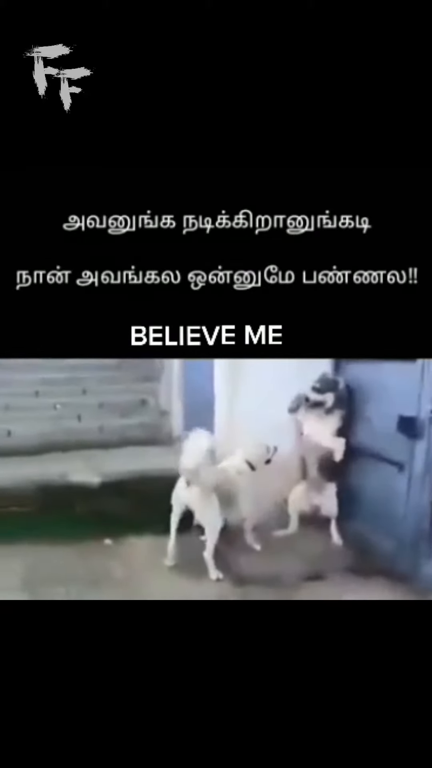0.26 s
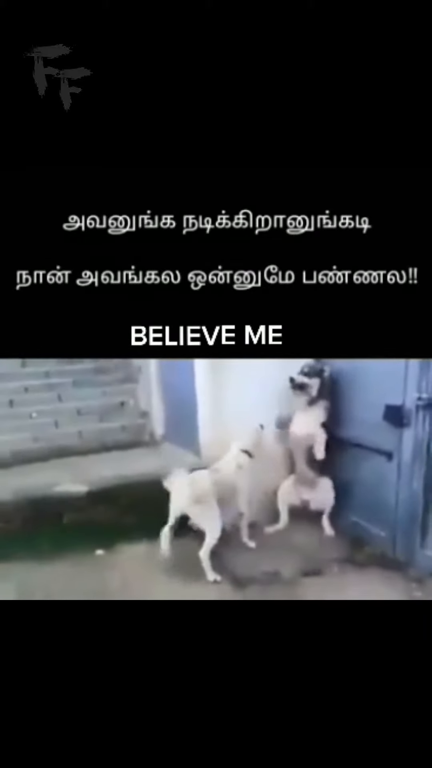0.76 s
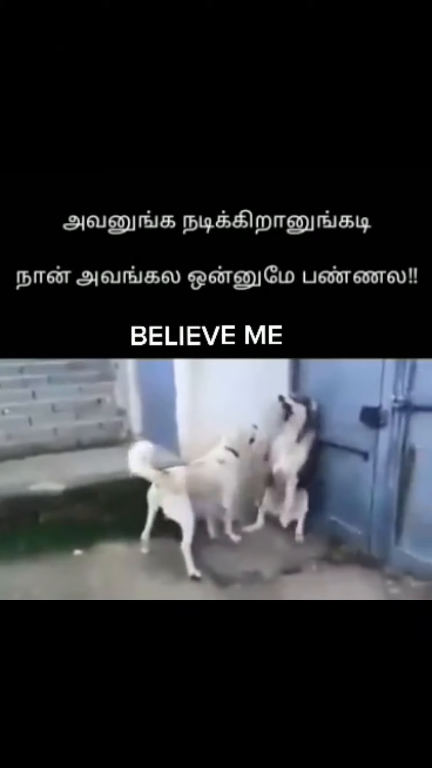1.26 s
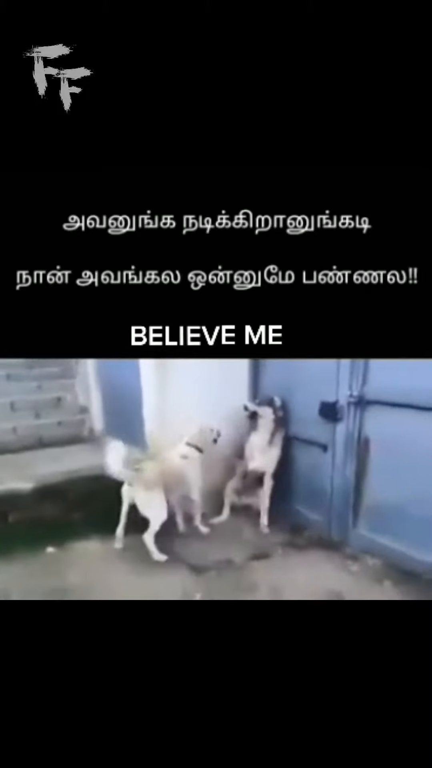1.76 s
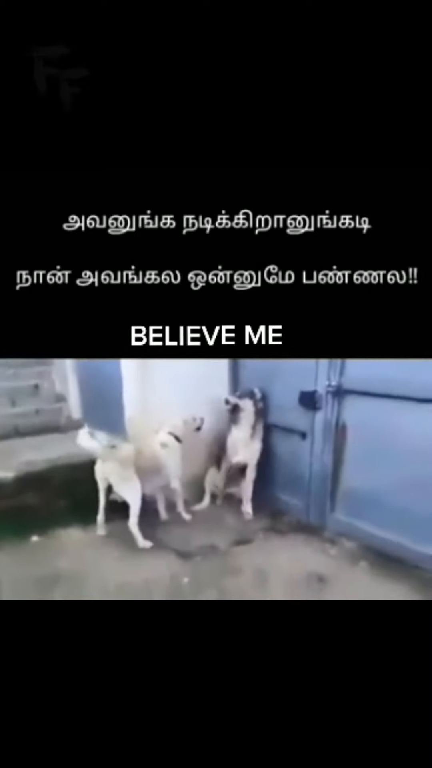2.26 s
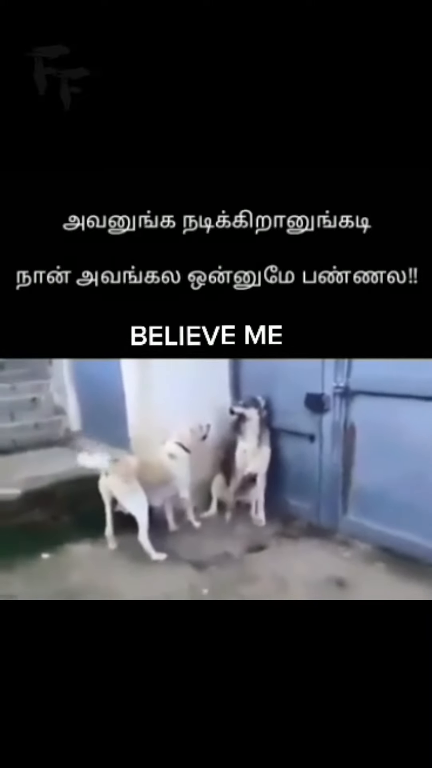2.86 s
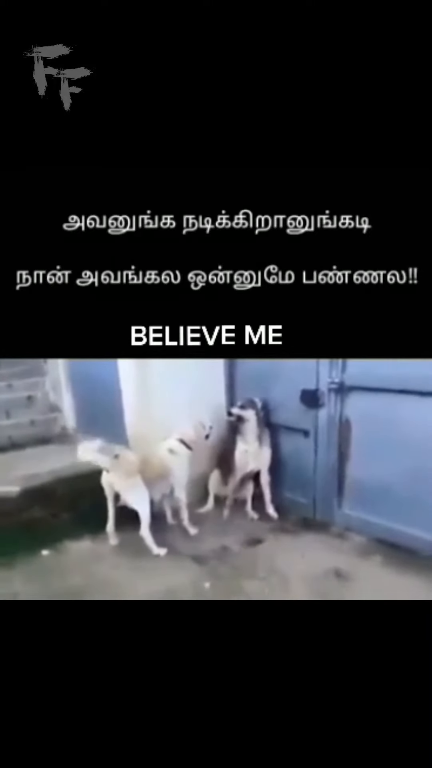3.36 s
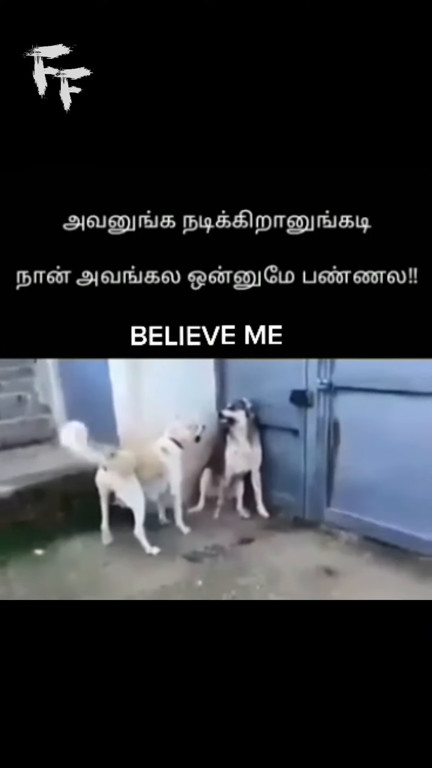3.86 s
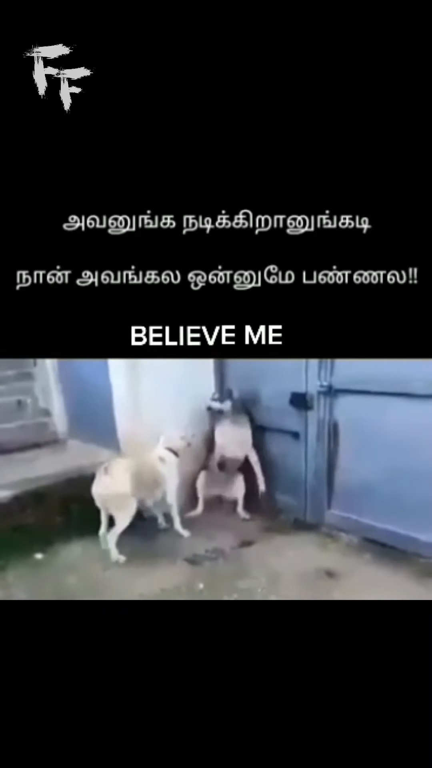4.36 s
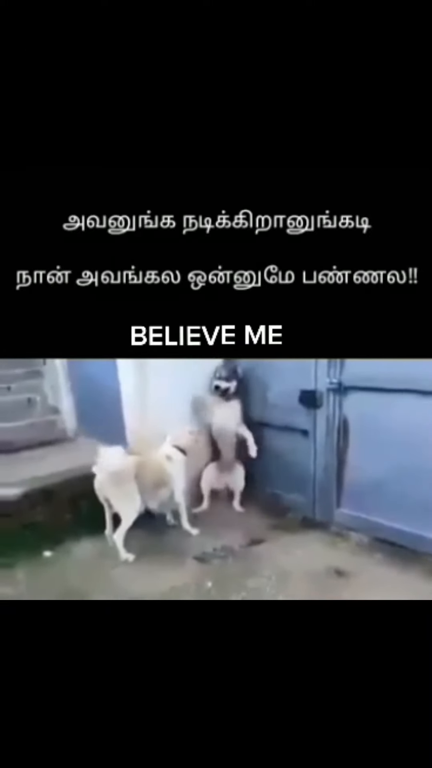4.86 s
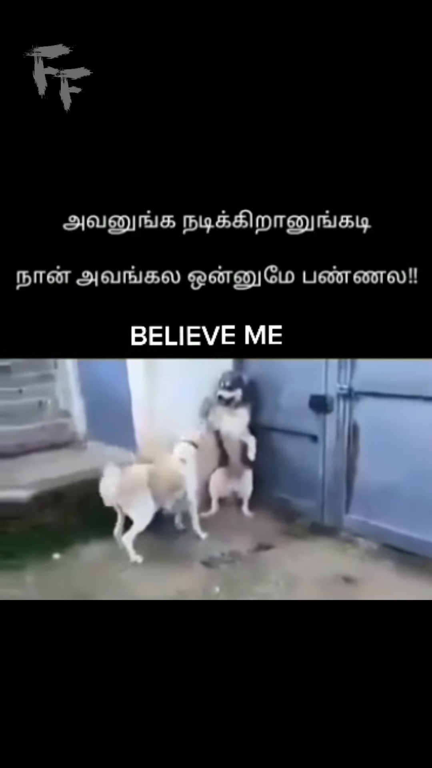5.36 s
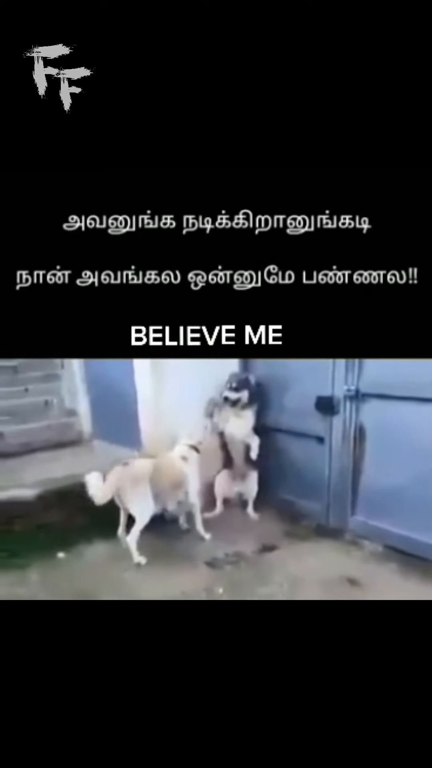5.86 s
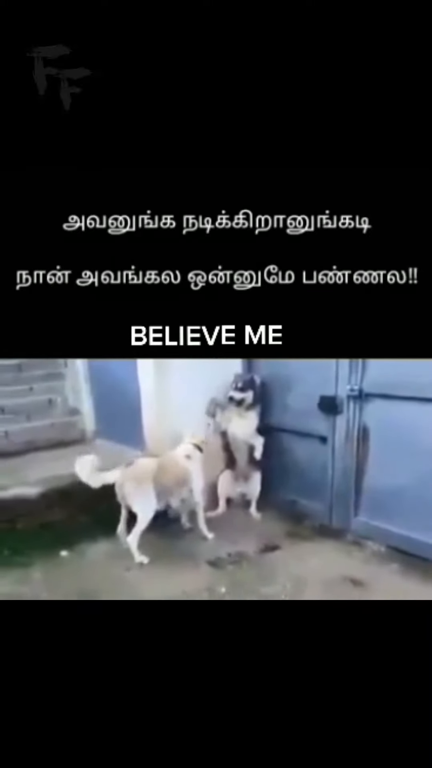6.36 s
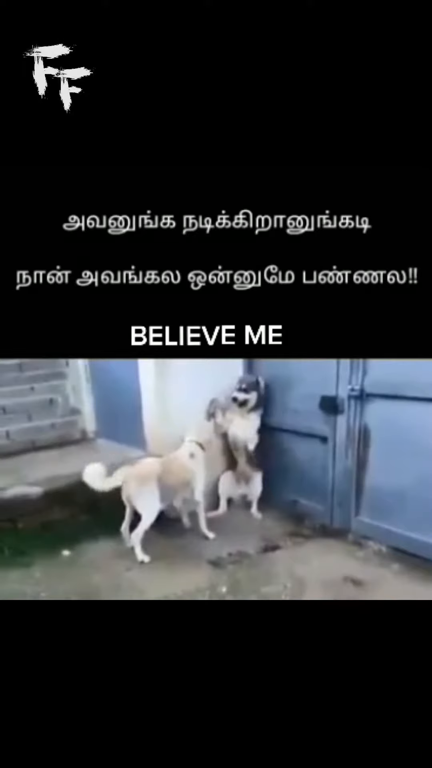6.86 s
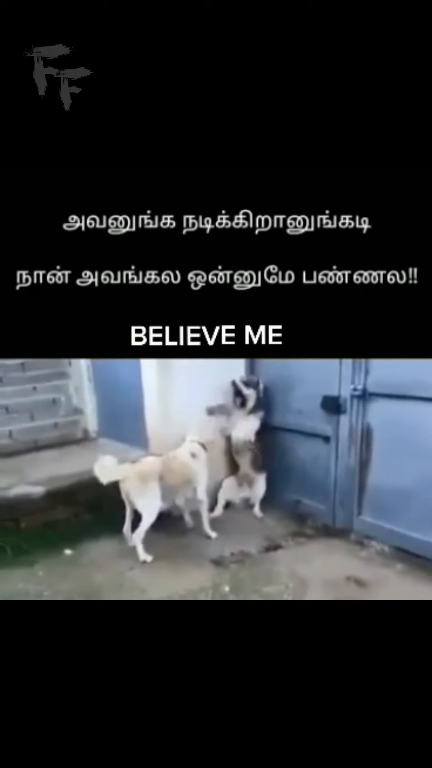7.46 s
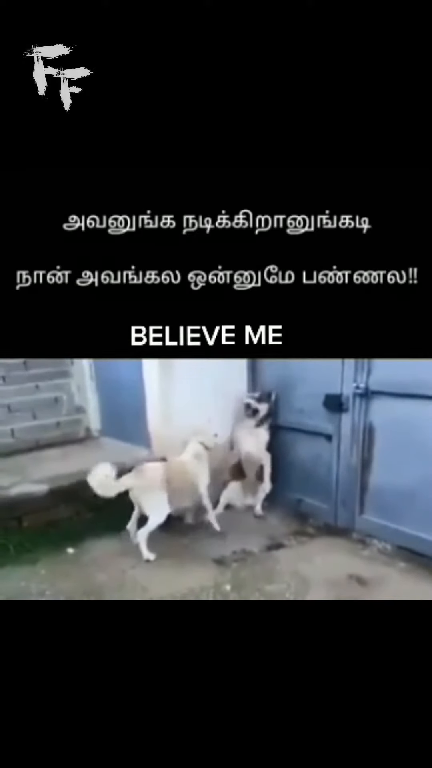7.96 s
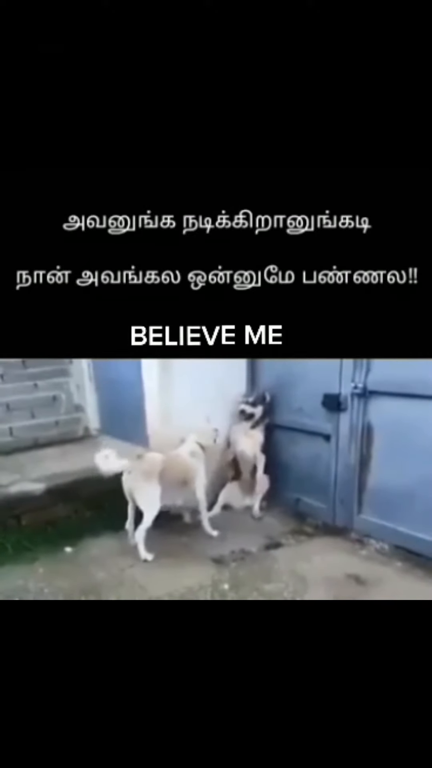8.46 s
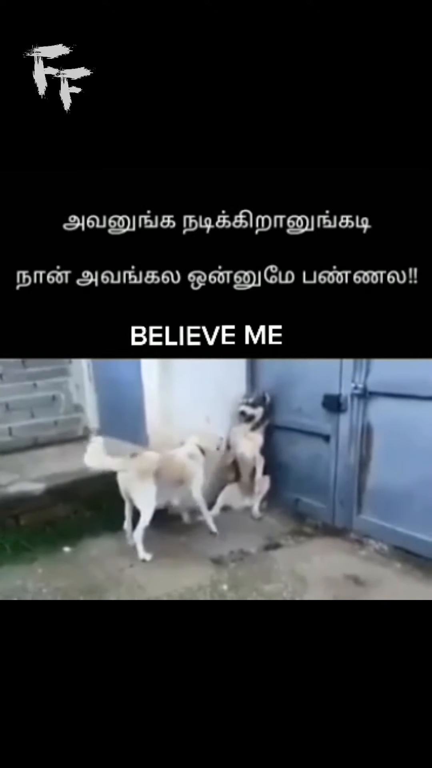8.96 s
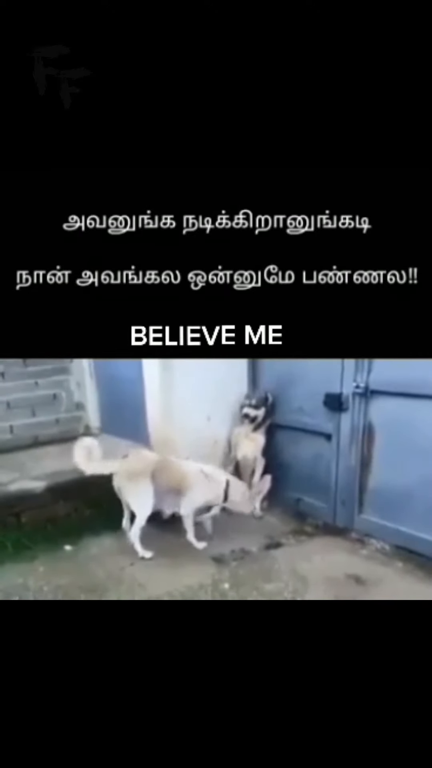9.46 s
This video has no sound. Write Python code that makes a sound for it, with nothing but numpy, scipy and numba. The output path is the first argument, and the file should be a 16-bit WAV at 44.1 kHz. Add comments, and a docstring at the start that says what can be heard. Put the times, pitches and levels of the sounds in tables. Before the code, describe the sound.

Two dogs face off outdoors with high yelps, harsh irregular barks, hissing snarls and low growls over a faint rumble.

```python
"""Two dogs in a paved yard, one backed against a wall and a steel gate, on a small, nearly mono recorder.
The cornered dog yelps first, then harsh barks burst out, ragged vocal folds ringing throat and mouth.
Between the uneven barks that follow, snarls hiss past bared teeth, growls flap low and claws scuff.
A last flurry brings a low whine, and one more bark ends it. All along, the near walls throw back short
echoes over a low rumble; the loudest barks drive the limiter, and some carry a crack of overload."""
import sys
import numpy as np
from scipy import signal
from scipy.fft import rfft, irfft, next_fast_len
from scipy.io import wavfile
from scipy.ndimage import uniform_filter1d, minimum_filter1d
from numba import njit

SR = 44100
rng = np.random.default_rng(int(sys.argv[2]) if len(sys.argv) > 2 else 0)


def wav_record(signal):
    """Record a signal, one row per channel, as 16-bit PCM in the file named by sys.argv[1]."""
    frames = np.transpose(np.atleast_2d(signal))
    bounded = np.clip(frames, -1, 1)
    # unit amplitude maps onto the largest positive 16-bit level
    quanta = np.round(bounded * 32767).astype(np.int16)
    wavfile.write(sys.argv[1], SR, quanta)


N = 429086

# Table levels are relative: each source adds its own trim.
# likeness of the noise in the left and right channels: frequency_hz, correlation
STEREO_LIKENESS = [(20, 1), (3700, 1), (4500, .96), (8000, .72), (13000, .8)]
# spectrum of the yard's low rumble: frequency_hz, density_db
RUMBLE_SPECTRUM = [(20, -23), (40, -8), (65, 0), (100, 0), (160, -5), (230, -15), (400, -26)]
# rise and fall of the rumble: time_s, level_db
RUMBLE_LEVELS = [(0, -34), (.25, -44), (1.498, -43), (2.65, -42.5), (3.06, -44.5), (3.76, -48),
                 (4.142, -36), (4.77, -49), (5.3, -39.5), (6.55, -40), (6.83, -48.5), (7.1, -39),
                 (8.2, -44), (8.941, -37.5), (9.73, -44.5)]
# echoes off the walls and gate: delay_s, level_db
WALL_ECHOES = [(.0036, -27.5), (.0091, -11), (0.0147, -11.5), (0.0212, -16.5)]
# notes at which the corner and gate ring: frequency_hz, width_hz, level_db
CORNER_MODES = [(372, 48, 0.5), (544, 130, -12.5), (1260, 7.2, -27), (2210, 6.7, -10.5)]
# claws on the paving: start_s, level_db, centre_hz, decay_s
CLAW_SCUFFS = [(1.789, -19, 990, 0.0098), (1.798, -26.5, 2200, 0.028), (2.836, -22, 2350, 0.014),
               (3.488, -29, 2300, 0.01), (4.125, -24, 2300, 0.011), (5.088, -39, 2400, 0.0087),
               (6.006, -27, 2360, .014), (7.018, -19.5, 2200, 0.014), (8.28, -11, 1750, 0.0067)]
# growls: start_s, attack_s, hold_s, release_s, level_db, start_pitch_hz, hold_end_pitch_hz
GROWLS = [(2.013, 0.28, 0.13, 0.25, -37, 100, 84.5), (4.88, 0.22, 0.017, 0.3, -33, 171, 148),
          (5.13, 0.35, 0.059, 0.072, -25, 125.5, 99.8), (5.746, 0.036, 0.57, 0.5, -46, 87.6, 70.4),
          (7.357, 0.032, 0.012, 0.1, -30.5, 67.3, 72.4), (7.547, 0.13, 0.067, 0.1, -28, 87.8, 109.3),
          (8.313, 0.058, 0.19, 0.64, -35.5, 109.7, 109.3)]
# snarls: start_s, attack_s, hold_s, release_s, throat_db, hiss_db, teeth_db
SNARLS = [(0, 0.012, 0.12, 0.56, -41, -37, -61.5), (0.407, 0.055, 0.035, 0.39, -36.5, -37.5, -67),
          (0.937, 0.081, 0.11, 0.2, -37.5, -29.5, -49), (1.28, .074, 0.09, 0.14, -41, -37.5, -52.5),
          (1.537, 0.03, 0.013, 0.23, -55, -39, -60), (1.925, 0.025, 0.18, 0.19, -54, -38, -58),
          (2.1, 0.075, 0.22, .1, -46, -55, -85), (2.392, 0.066, 0.022, 0.29, -41.5, -38, -77),
          (2.565, 0.068, 0.094, .2, -49, -47, -68), (2.765, 0.091, 0.088, 0.12, -42.5, -38.5, -71),
          (3.3, 0.049, 0.2, 0.043, -72, -39.5, -60.5), (3.4, .05, .3, .15, -45, -60, -78),
          (3.68, .32, .2, .12, -45.5, -40.5, -69), (4.848, 0.083, 0.24, 0.24, -43, -43.5, -71),
          (5.21, 0.086, 0.07, 0.75, -38.5, -41, -66.5), (5.65, 0.059, 0.15, 0.11, -43, -34, -56.5),
          (5.977, 0.029, 0.48, 0.079, -46, -38, -69.5), (6.766, 0.011, 0.26, 0.037, -38, -38.5, -58.5),
          (6.93, 0.058, .03, 0.038, -45, -35.5, -60), (7.055, 0.048, 0.093, .1, -48.5, -44.5, -76),
          (7.158, 0.13, 0.05, 0.36, -44.5, -36.5, -72), (7.46, 0.051, 0.11, 0.54, -42, -43, -71.5),
          (7.952, .04, 0.13, 0.41, -35, -37.5, -56.5), (8.54, 0.037, 0.12, 0.17, -58, -48, -70),
          (8.682, 0.15, 0.068, 0.21, -41.5, -35, -66), (8.976, 0.057, 0.22, 0.094, -45, -40.5, -74),
          (9.497, 0.019, 0.025, 0.22, -39, -40.5, -55)]
# air in a snarling throat: frequency_hz, density_db
THROAT_SPECTRUM = [(200, -24), (330, -17), (450, -9), (620, -1.5), (900, -3.5), (1350, -5.5), (1800, -6.5),
                   (2600, -52.5)]
# hiss of a snarl: frequency_hz, density_db
HISS_SPECTRUM = [(1000, -10.5), (1600, -6), (2300, -5.5), (3100, -7.5), (3900, -15.5), (4600, -38),
                 (5800, -37), (8000, -41), (11000, -48), (13000, -69)]
# air rushing past the teeth: frequency_hz, density_db
TEETH_SPECTRUM = [(3500, -29), (4400, -13.5), (4800, 4.5), (6500, 2), (8000, -9), (11000, -17.5),
                  (13000, -21)]
# note to which the curled lips tune the snarls: time_s, centre_hz
LIP_TUNING = [(0.451, 2410), (.55, 2840), (1.0, 2050), (2.2, 2095), (2.5, 2360), (2.9, 2195), (4.0, 2480),
              (5.1, 2130), (5.45, 2280), (6.0, 2134), (6.4, 2446), (7.2, 2420), (7.35, 2280), (8.7, 2364),
              (8.85, 2580), (9.201, 2250)]
# air catching behind the lips: start_s, attack_s, hold_s, release_s, level_db, from_hz, to_hz
WHEEZES = [(.45, 0.028, 0.037, 0.042, -35.5, 2370, 2840), (2.42, .04, .04, .08, -48, 2350, 2423),
           (5.28, 0.03, .1, 0.098, -41.5, 2120, 2345), (7.22, 0.043, 0.038, .07, -41.5, 2480, 2330),
           (8.77, 0.054, 0.047, 0.074, -42, 2400, 2570)]
# short, bright cracks, mostly as the loudest barks overload the recorder: start_s, level_db
OVERLOAD_CRACKS = [(4.825, -37), (5.623, -29), (6.778, -34), (7.907, -33), (9.473, -24)]
# yelps and whines, one list of points a glide: time_s, pitch_hz, fundamental_db, octave_db, husk_db
YELP_GLIDES = [
    [(.094, 1380, -38, -40, -3), (.114, 1500, -21, -27, -3), (.136, 1770, -14, -23, -4),
     (.144, 1830, -23, -24, -4), (.152, 1870, -11, -23, -12), (.165, 1885, -9, -21, -15),
     (.185, 1885, -9, -24, -19), (.196, 1860, -17, -25, -14), (.203, 1830, -30, -26, -8),
     (.216, 1790, -14, -26, -14), (.224, 1760, -24, -28, -6), (.231, 1720, -12, -27, -8),
     (.252, 1540, -21, -29, -2), (.268, 1680, -29, -46, -4), (.3, 1600, -42, -56, -3)],
    [(.31, 1500, -42, -60, -8), (.33, 1505, -25, -52, -14), (.355, 1495, -25, -52, -14),
     (.395, 1490, -44, -60, -8)],
    [(1.335, 1600, -44, -42, -3), (1.38, 1780, -27, -32, -4), (1.4, 1870, -21, -29, -7),
     (1.422, 1885, -16.5, -28, -11), (1.445, 1790, -27, -31, -3), (1.48, 1640, -40, -44, -2)],
    [(8.35, 310, -48, -62, -8), (8.41, 440, -27, -46, -6), (8.47, 610, -21, -42, -6),
     (8.52, 610, -20, -43, -6), (8.56, 580, -30, -52, -5), (8.68, 560, -46, -66, -4)],
]
# narrow peaks colouring the barks' upper rasp, before each bark shifts them: centre_hz, width_hz, level_db
RASP_PEAKS = [(1978, 82, 8.5), (2320, 60, 1), (2564, 120, -1.5), (3027, 46, 2), (3376, 37, -0.5),
              (3690, 22, 0), (4027, 15, 2.5)]
# the voice locking onto one resonance: start_s, length_s, level_db, from_hz, to_hz
BRAYS = [(.81, 0.0061, -11.5, 560, 559), (.83, 0.034, -13, 588, 656), (0.906, 0.027, -15.5, 1465, 1396),
         (1.177, 0.033, -11, 890, 916), (1.261, 0.034, -17.5, 567, 559), (1.471, 0.032, -13.5, 678, 693),
         (1.523, 0.039, -16, 568, 565), (1.868, .02, -12.5, 777, 733), (1.891, 0.014, -7.5, 615, 647),
         (3.202, .012, -11.5, 1025, 1057), (3.215, 0.018, -9, 628, 654), (3.247, 0.017, -10.5, 635, 606),
         (3.265, .024, -9.5, 1325, 1358), (4.402, 0.013, -4.5, 565, 584), (4.455, 0.031, -13, 1300, 1253),
         (4.477, 0.021, -12, 607, 630), (4.52, 0.032, -8, 589, 565), (4.775, .036, -11, 581, 574.5),
         (4.792, 0.013, -19.5, 1700, 1600), (5.529, 0.012, -13.5, 783, 764), (5.572, 0.011, -6.5, 850, 726),
         (5.617, 0.026, -6.5, 1167, 1184), (6.686, 0.029, -10.5, 851, 803), (6.725, .014, -8, 1200, 1282),
         (6.755, 0.031, -8.5, 1156, 1454), (7.775, 0.016, -13, 613, 670), (7.811, 0.016, -8.5, 969, 924),
         (7.837, 0.023, -5.5, 1021, 1024), (7.855, 0.017, -6.5, 713, 792), (9.371, 0.013, -14, 920, 962),
         (9.397, 0.013, -9.5, 790, 876), (9.411, 0.013, -6.5, 550, 556), (9.428, .018, -10.5, 852, 865),
         (9.454, 0.018, -9.5, 1300, 1467)]
# barks: start_s, attack_s, hold_s, release_s, throat_db, jaw_db, mouth_db, rasp_db, brightening_db,
# throat_hz, jaw_from_hz, jaw_to_hz, mouth_from_hz, mouth_to_hz, top_rasp_peak_hz, full_effort_pitch_hz,
# roughness (0-1), chest_db
BARKS = [(.784, 0.03, 0.081, 0.055, -13.5, -12, -11.5, -17, 2.5, 590, 840, 906, 1550, 1260, 3975, 643, 0.47, -19.5),
         (1.135, 0.049, 0.019, 0.094, -18, -12, -21, -31, 2, 570, 850, 890, 1220, 1410, 3780, 449, 0.31, -2.5),
         (1.185, 0.08, 0.026, 0.025, -17, -15, -13, -25.5, -0.5, 573, 850, 910, 1500, 1440, 3780, 557.4, 0.34, -27),
         (1.41, 0.078, 0.075, 0.046, -17, -17, -21.5, -28.5, 8.5, 610, 725, 800, 1790, 1440, 4123, 621, 0.46, -22.5),
         (1.838, 0.04, 0.043, 0.069, -15, -12.5, -15, -23, 2, 676, 756, 990, 1260, 1530, 3700, 629.8, 0.38, -19),
         (3.181, .024, 0.069, 0.045, -10, -12, -11.5, -18.5, 3.5, 615, 1055, 843, 1440, 1350, 3910, 636.6, 0.29, -20),
         (4.376, 0.035, 0.012, 0.035, -12.5, -10.5, -12.5, -23, 7, 574, 960, 1040, 1170, 1250, 3770, 577, 0.25, -19.5),
         (4.41, 0.03, 0.048, 0.055, -17.5, -10.5, -15, -22.5, 1.5, 580, 1000, 875, 1270, 1350, 3745, 587.4, 0.51, -17),
         (4.494, 0.028, 0.039, 0.083, -18.5, -17.5, -12.5, -20, -4.5, 634, 895, 940, 1300, 1210, 3760, 574.4, 0.34, -12.5),
         (4.724, 0.071, 0.015, 0.05, -13, -17, -17, -29, 3.5, 610, 780, 980, 1730, 1400, 3560, 571.5, 0.26, -15.5),
         (5.517, 0.015, 0.015, 0.04, -17.5, -10.5, -21, -36.5, 4, 660, 780, 808, 1400, 1430, 3830, 396, 0.28, -17),
         (5.54, 0.037, 0.046, 0.031, -12.5, -8, -8, -16.5, 5, 587, 805, 915, 1380, 1350, 3770, 398.3, 0.36, -14.5),
         (6.665, 0.023, .075, 0.056, -11.5, -11.5, -11.5, -22.5, 9.5, 658, 830, 744, 1210, 1320, 4080, 398, 0.31, -25),
         (7.711, 0.089, 0.076, 0.05, -11, -10.5, -12.5, -15.5, 8.5, 632, 770, 1006, 1890, 1330, 4060, 540, 0.49, -12),
         (8.01, 0.065, 0.079, 0.058, -15.5, -19, -24.5, -32.5, 8.5, 636, 740, 804, 1570, 1670, 4110, 610, 0.54, -13.5),
         (8.205, 0.028, 0.016, 0.098, -26, -40, -28, -56, -9, 480, 854, 850, 1400, 1380, 3820, 522, 0.19, -7.5),
         (8.38, 0.052, 0.096, 0.046, -23.5, -21.5, -21, -34.5, -5.5, 595, 970, 1024, 1570, 1370, 3900, 617, 0.47, -18.5),
         (9.358, 0.019, 0.087, 0.063, -16, -11.5, -13, -22.5, 0.5, 570, 925, 890, 1470, 1290, 3970, 289.6, 0.26, -14)]
# share of the brightening and lingering as the mouth opens: throat, jaw, mouth, rasp
OPENING_SHARES = (-0.69, -0.16, 1, 0.34)


def from_db(db):
    """Decibels to gain."""
    return 10 ** (np.asarray(db) / 20)


def to_db(gain):
    """Gain to decibels."""
    return 20 * np.log10(gain + 1e-6)


def rms_one(x):
    """Scale to unit power."""
    return x / np.sqrt(np.mean(x ** 2) + 1e-20)


def evened(x):
    """Hold the short-term power at one."""
    return x / np.sqrt(np.abs(uniform_filter1d(x * x, size=360)) + 1e-12)


def at_hz(points, hz):
    """Read a spectrum on a log-frequency axis."""
    points_hz, values = np.transpose(points)
    return np.interp(np.log(hz), np.log(points_hz), values)


def band(x, hz, kind="band", order=2):
    """Butterworth filter."""
    return signal.sosfilt(signal.butter(order, np.clip(hz, 10, .45 * SR), kind, fs=SR, output="sos"), x)


def noise_band(size, hz, order=2):
    """Band of noise at unit power."""
    return rms_one(band(rng.standard_normal(size), hz, order=order))


def drift(rate_hz, size):
    """Smooth random wander with spread 1."""
    r = np.exp(-40 * np.pi * rate_hz / SR)
    slow = signal.lfilter([1], [1, -2 * r, r * r], rng.standard_normal(size // 20 + 3002))[1000:]
    return np.interp(np.arange(size) / 20, np.arange(len(slow)), rms_one(slow))


def wavering_phase(hz, waver, waver_hz, size):
    """Phase in radians of a vibration whose rate wanders by the share waver."""
    return 2 * np.pi * np.cumsum(hz * (1 + waver * drift(waver_hz, size))) / SR


@njit
def resonate(x, hz, width_hz):
    """A two-pole resonance whose centre moves."""
    y, r = np.zeros(len(x)), np.exp(-np.pi * width_hz / SR)
    for i in range(2, len(x)):
        drive = (1 - r * r) / 2 * (x[i] - x[i - 2])
        y[i] = drive + 2 * r * np.cos(2 * np.pi * hz[i] / SR) * y[i - 1] - r * r * y[i - 2]
    return y


def ring(x, hz, width_hz):
    """A resonance that stays on one note."""
    return resonate(x, np.full(len(x), float(hz)), float(width_hz))


def coloured(spectrum):
    """Stereo noise of a given spectrum at unit power, wider in the treble."""
    size = next_fast_len(N)
    hz = np.maximum(np.fft.rfftfreq(size, 1 / SR), 1)
    inside = (hz > spectrum[0][0]) & (hz < spectrum[-1][0])
    mid, side = rfft(rng.standard_normal((2, size))) * from_db(at_hz(spectrum, hz)) * inside
    alike = at_hz(STEREO_LIKENESS, hz)
    left_right = np.sqrt(1 + alike) * mid + np.sqrt(1 - alike) * side * [[1], [-1]]
    return rms_one(irfft(left_right, size)[:, :N])


def envelope(t, attack_s, hold_s, release_s, curve=1.3):
    """Attack, hold and release (the time to fall 20 dB)."""
    fall_db = -20 * np.maximum(t - attack_s - hold_s, 0) / release_s
    return np.minimum(t / attack_s, 1) ** curve * from_db(fall_db)


def swell(start_s, attack_s, hold_s, release_s, curve=1.5):
    """One call: the samples it covers, the time since its start, and its effort."""
    end_s = start_s + attack_s + hold_s + 2 * release_s
    at = np.arange(max(int(start_s * SR), 0), min(int(end_s * SR), N))
    t = (at - at[0]) / SR
    return at, t, envelope(t, attack_s, hold_s, release_s, curve)


def rumble():
    """The yard's background: a low, lumpy rumble."""
    level_db = np.interp(np.arange(N) / SR, *np.transpose(RUMBLE_LEVELS))
    lumps_db = 3 * drift(10, N)
    return from_db(level_db + lumps_db) * coloured(RUMBLE_SPECTRUM)


def yard(x, tail_db=-24, t60_s=0.91, shift_s=0.00013):
    """Near walls add a short tail and quick echoes that shift as the dogs move; the corner rings."""
    t, now = np.arange(SR // 2) / SR, np.arange(N) / SR
    tail = rng.standard_normal(len(t)) * from_db(-60 * t / t60_s) * (t > .012)
    tail = from_db(tail_db) * rms_one(tail) / np.sqrt(len(t))
    wet = x + signal.fftconvolve(x, tail[None], axes=1)[:, :N]
    for delay_s, db in WALL_ECHOES:
        then = now - delay_s + shift_s * drift(1.14, N)
        wet += from_db(db) * np.array([np.interp(then, now, side) for side in x])
    wet /= np.sqrt(1 + sum(from_db(db) ** 2 for _, db in WALL_ECHOES))
    return wet + sum(from_db(db) * ring(wet.mean(axis=0), hz, width) for hz, width, db in CORNER_MODES)


def scuffs(trim_db=-12):
    """Each scrape of a claw on the paving is a short gritty burst."""
    out, t = np.zeros(N), np.arange(SR // 10) / SR
    for start_s, db, hz, decay_s in CLAW_SCUFFS:
        grit = noise_band(len(t), [hz / 2, hz * 1.32], order=4)
        first = int(start_s * SR)
        out[first:first + len(t)] += from_db(db + trim_db) * grit * np.exp(-t / decay_s)
    return out


def overload_cracks(decay_s=0.0035, band_hz=(2800, 7000)):
    """Short, bright bursts of noise at set times: the crack of a recorder overloaded by a bark."""
    out, t = np.zeros(N), np.arange(SR // 20) / SR
    for start_s, db in OVERLOAD_CRACKS:
        first = int(start_s * SR)
        out[first:first + len(t)] += from_db(db) * noise_band(len(t), band_hz) * np.exp(-t / decay_s)
    return out


def growls(trim_db=-3, rattle_db=-14, jitter=0.032, flap_jitter=0.058, sag_octaves_per_s=0.5):
    """Slow flaps of the folds: a deep fundamental that sinks as it runs out, under a dull rattle."""
    out = np.zeros(N)
    for start, attack, hold, release, db, start_hz, held_hz in GROWLS:
        at, t, effort = swell(start, attack, hold, release, curve=0.61)
        pitch_hz = start_hz * (held_hz / start_hz) ** np.minimum(t / (attack + hold), 1)
        pitch_hz *= 2 ** (-sag_octaves_per_s * np.clip(t - attack - hold, 0, release))
        phase = wavering_phase(pitch_hz, jitter, 35, len(at))
        flap_count = np.floor(phase / (2 * np.pi) + flap_jitter * drift(50, len(at)))
        flaps = np.diff(flap_count, prepend=0) * from_db(3.9 * drift(60, len(at)))
        rattle = from_db(rattle_db) * rms_one(band(flaps, [150, 550], order=4))
        gain = effort * from_db(db + trim_db + 2 * drift(13, len(at)))
        out[at] += gain * (np.sqrt(2) * np.sin(phase) + rattle)
    return out


def snarls(flutter_db=2, lips_width_hz=240.0, lips_wander=0.06):
    """Air is forced through a fluttering throat and past bared teeth, where the curled lips tune it."""
    resting_db = [[-54.5], [-60], [-78]]  # throat, hiss and teeth stay faint between snarls
    power = from_db(resting_db) ** 2 * np.ones(N)
    for start, attack, hold, release, *levels_db in SNARLS:
        at, _, effort = swell(start, attack, hold, release, curve=0.7)
        power[:, at] += np.outer(from_db(levels_db), effort) ** 2
    throat, hiss, teeth = np.sqrt(power) * from_db(flutter_db * drift(56, N))
    tuning_hz = np.interp(np.arange(N) / SR, *np.transpose(LIP_TUNING))
    tuning_hz *= np.exp(lips_wander * drift(6.4, N))
    lips = from_db(-1) * rms_one(resonate(coloured(HISS_SPECTRUM)[0], tuning_hz, lips_width_hz))
    return (throat * from_db(-1) * coloured(THROAT_SPECTRUM)
            + hiss * from_db(-5 - 0.1 * drift(7.2, N)) * (coloured(HISS_SPECTRUM) + lips)
            + teeth * from_db(-1) * coloured(TEETH_SPECTRUM))


def wheezes(width_hz=130.0, flutter_hz=75, flutter_depth=0.36):
    """Air catches behind the curled lips: a narrow, gliding note chopped by the fluttering throat."""
    out = np.zeros(N)
    for start, attack, hold, release, db, from_hz, to_hz in WHEEZES:
        at, t, effort = swell(start, attack, hold, release, curve=1)
        hz = np.interp(t, [0, attack + hold], [from_hz, to_hz])
        note = rms_one(band(resonate(rng.standard_normal(len(at)), hz, width_hz), [1700, 3400]))
        chop = 1 + flutter_depth * np.sin(wavering_phase(flutter_hz, 0.23, 30, len(at)))
        out[at] += from_db(db) * effort * chop * note
    return out


def yelps(waver=0.041, shake_db=3, flutter_hz=150, rasp_hz=470, husk_band_hz=(3000, 3900), top_hz=3950):
    """A thin squeal, pure at the top of its arch, husky and shaky where the pitch slides."""
    out = np.zeros(N)
    for glide in YELP_GLIDES:
        times_s, *columns = np.transpose(glide)
        at = np.arange(int(times_s[0] * SR), int(times_s[-1] * SR))
        pitch_hz, fundamental_db, octave_db, husk_db = [np.interp(at / SR, times_s, c) for c in columns]
        husk, size = from_db(husk_db), len(at)
        phase = wavering_phase(pitch_hz, waver * husk, 160, size)
        shake = from_db(shake_db * husk * drift(100, size)) / np.sqrt(1 + husk ** 2)
        # the throat flutters, and a second, lower vibration rasps against the squeal
        for rate_hz, depth in ((flutter_hz, .55), (rasp_hz, .5)):
            shake *= 1 + depth * husk * np.sin(wavering_phase(rate_hz, 0.14, 40, size))
        high_husk = husk * from_db(octave_db - 3) * noise_band(size, husk_band_hz, order=4)
        out[at] += shake * high_husk
        for harmonic, db in ((1, fundamental_db), (2, octave_db - 1)):
            air = resonate(rng.standard_normal(size), harmonic * pitch_hz, width_hz=310.0)
            air = rms_one(band(air, .65 * pitch_hz.min(), "high", order=4))
            breath = husk * from_db(4 * (harmonic - 3.5)) * air
            out[at] += shake * from_db(db) * (np.sqrt(2) * np.sin(harmonic * phase) + breath)
    return band(out + 1e-18, top_hz, "low", order=16)


def folds(pitch_hz, rough, jitter=0.0861, wander=0.0464, alternation=0.46, shimmer_db=8):
    """Ragged vocal folds: uneven pulses, strong and weak in turn, and a puff of air in each cycle."""
    size = len(pitch_hz)
    waver = np.exp(jitter * rough * drift(110, size) + wander * drift(21.4, size))
    cycles = np.cumsum(pitch_hz * waver) / SR
    pulses = sum(np.cos(2 * np.pi * k * cycles) for k in range(1, 15))
    pulses *= 1 + alternation * np.cos(np.pi * cycles)
    pulses *= from_db(shimmer_db * rough * drift(84, size))
    air = band(rng.standard_normal(size), 3300, "low") * (1 + 0.52 * np.cos(2 * np.pi * cycles))
    return np.sqrt(1 - rough) * rms_one(pulses) + np.sqrt(rough) * rms_one(air)


def upper_rasp(source, top_hz):
    """Narrow peaks and deep notches colour the upper rasp, placed differently in each bark."""
    stretch = top_hz / RASP_PEAKS[-1][0]
    high = sum(from_db(db) * ring(source, hz * stretch, width) for hz, width, db in RASP_PEAKS)
    return evened(band(high, [1850, 4130 * stretch], order=9))


def cheeks(x, notch_hz=2714, width_hz=150, depth=0.52):
    """The hollow of the cheeks is a side cavity that swallows one band of the voice."""
    return x - depth * ring(x, notch_hz, width_hz)


def brays(attack_s=.008, release_s=0.01, folds_hz=620, rasp_db_per_octave=11, teeth_db=-17):
    """A harmonic locks to a resonance and blares; the higher, the wider the mouth and the more rasp."""
    out, rush = np.zeros(N), np.zeros(N)
    lead_s = attack_s / 2
    for start, length, db, from_hz, to_hz in BRAYS:
        at, t, effort = swell(start - lead_s, attack_s, length - lead_s, release_s)
        hz = np.interp(t, [0, lead_s + length], [from_hz, to_hz])
        blare = np.sqrt(2) * np.sin(wavering_phase(hz, 0.036, 150, len(at)))
        blare *= from_db(db + 1.5 * drift(180, len(at)))
        rasp_db = db - 14 + rasp_db_per_octave * np.log2(to_hz / (2 * folds_hz))
        harmonic = max(round(to_hz / folds_hz), 1)
        source = folds(hz / harmonic, rough=0.49)
        out[at] += effort * (blare + from_db(rasp_db) * upper_rasp(source, top_hz=3900))
        rush[at] += effort * from_db(rasp_db + teeth_db)
    return out + rush * coloured(TEETH_SPECTRUM)


def giving_way(dip_db=-4.5):
    """Gain of the ragged part of a bark: it sinks while the voice is locked in a bray."""
    locked = np.zeros(N)
    for start, length, *_ in BRAYS:
        locked[int(start * SR):int((start + length) * SR)] = 1
    return from_db(dip_db * uniform_filter1d(locked, size=220))


def barks(sag=.008, sway=0.062, lurch_db=2, parting_s=0.027, puff_db=-19, teeth_db=-13):
    """The folds drive throat, jaw and mouth, with a rasp on top; the pitch sags as the effort falls."""
    out, rush, ragged_gain = np.zeros(N), np.zeros(N), giving_way()
    for (start, attack, hold, release, *levels_db, bright_db, throat_hz, jaw_from, jaw_to,
         mouth_from, mouth_to, top_hz, pitch_hz, rough, chest_db) in BARKS:
        at, t, effort = swell(start, attack, hold, release)
        size = len(at)
        # as the mouth opens, its resonance glides, gains weight and outlasts the throat's
        opening = np.minimum(t / (attack + hold), 0.98)
        curves_db = []
        for db, share in zip(levels_db, OPENING_SHARES):
            shape = envelope(t, attack, hold * (1 + 0.045 * share), release * (1 + 0.042 * share))
            tilt_db = share * bright_db * (opening - 0.56)
            curves_db.append(db + to_db(shape) + tilt_db + lurch_db * drift(31, size))
        throat_db, jaw_db, mouth_db, rasp_db = curves_db
        source = folds(pitch_hz * np.exp(sag * np.maximum(to_db(effort), -25)), rough)
        # the resonances sway as the head jerks
        jaw_hz = (jaw_from + (jaw_to - jaw_from) * opening) * np.exp(sway * drift(14, size))
        mouth_hz = (mouth_from + (mouth_to - mouth_from) * opening) * np.exp(sway * drift(23, size))
        throat_hz = throat_hz * np.exp(sway * drift(17.3, size))
        throat = evened(band(resonate(source, throat_hz, width_hz=85.0), [450, 760]))
        jaw = evened(band(resonate(source, jaw_hz, width_hz=90.0), [680, 1120]))
        mouth = evened(band(resonate(source, mouth_hz, width_hz=170.0), [1080, 2300], order=3))
        voice = from_db(throat_db) * throat + from_db(jaw_db + 0.05) * jaw
        voice += from_db(mouth_db - 0.7) * mouth
        # the rasp and the hiss past the teeth come in only as the jaws part
        parted = np.minimum(t / parting_s, 1)
        rasp = parted * from_db(rasp_db - 0.5) * upper_rasp(source, top_hz)
        rush[at] += parted ** 2 * from_db(1.44 * rasp_db + teeth_db)
        # the chest booms under the voice, and the blast of air thumps
        chest = from_db(chest_db) * rms_one(band(source, [320, 450]))
        puff = from_db(puff_db) * noise_band(size, [15, 290])
        out[at] += ragged_gain[at] * voice + rasp + from_db(throat_db) * (chest + puff)
    return out + rush * coloured(TEETH_SPECTRUM)


def scene(yelp_wall_share=.35):
    """At the microphone: the dogs with the yard's echoes; growls and most of each yelp arrive dry."""
    background = rumble()
    squeals = cheeks(yelps())
    voice = np.array([cheeks(side) for side in barks() + brays()])
    echoing = voice + overload_cracks() + yelp_wall_share * squeals + scuffs() + snarls() + wheezes()
    return yard(echoing) + (1 - yelp_wall_share) * squeals + growls() + background


def record(dry, ceiling=.97, release_db_per_s=900, stopband_hz=13520):
    """The recorder's fast limiter holds the loudest barks just under full scale; the top is cut."""
    over_db = np.maximum(20 * np.log10(np.abs(dry).max(axis=0) / ceiling + 1e-9), 0)
    recovery_db = release_db_per_s * np.arange(N) / SR
    gain = from_db(recovery_db - np.maximum.accumulate(over_db + recovery_db))
    gain = uniform_filter1d(minimum_filter1d(gain, size=61), size=61)  # eases in ahead of each peak
    return signal.sosfilt(signal.cheby2(12, 60, stopband_hz, fs=SR, output="sos"), dry * gain)


dry = scene()
out = record(dry)
wav_record(out)
```